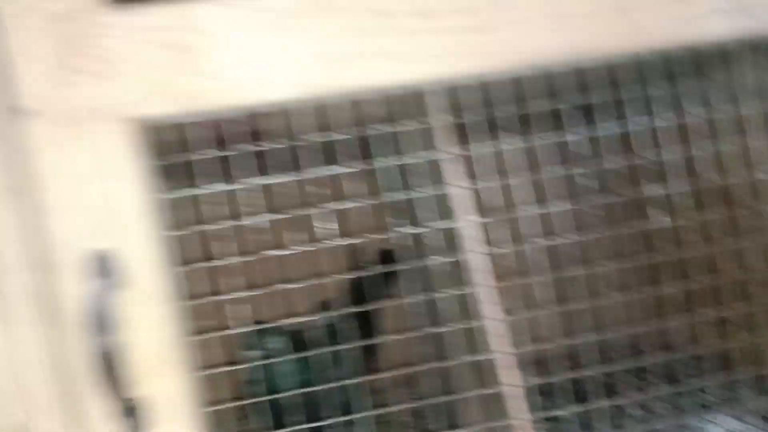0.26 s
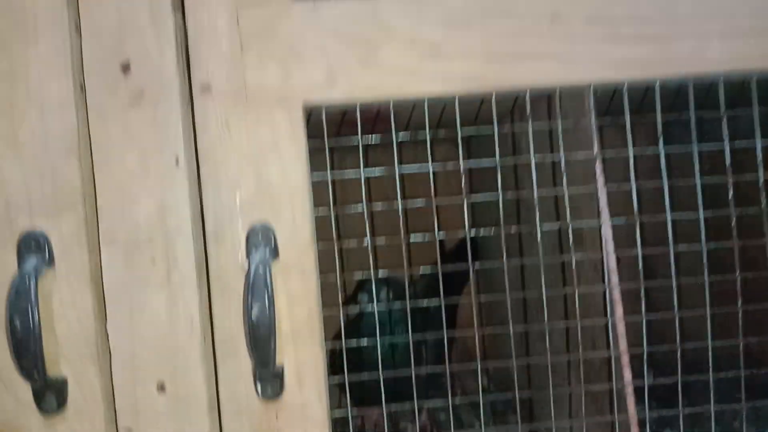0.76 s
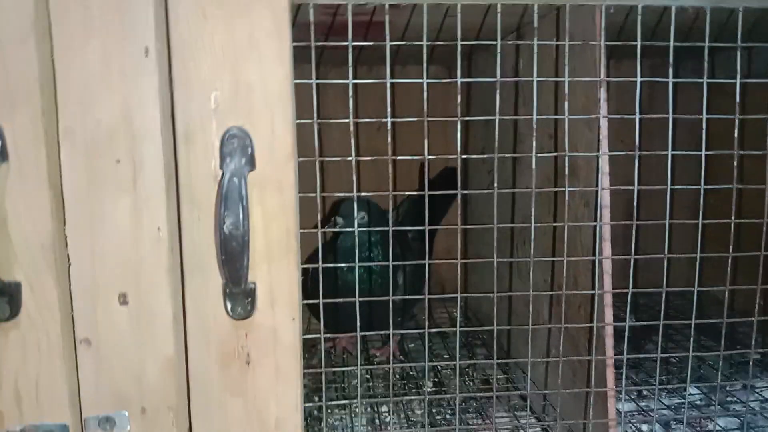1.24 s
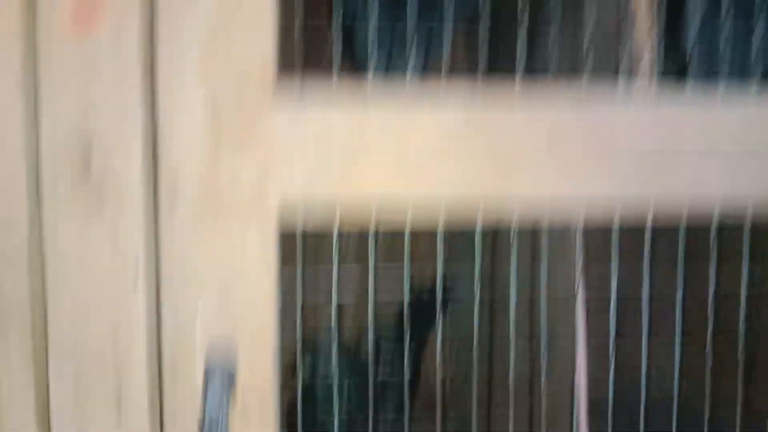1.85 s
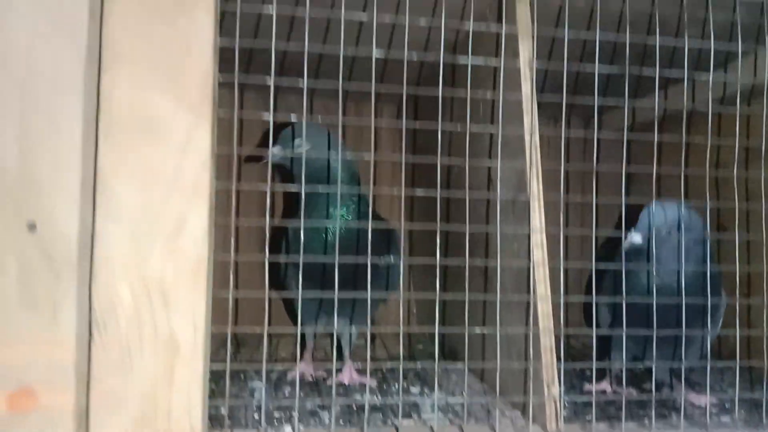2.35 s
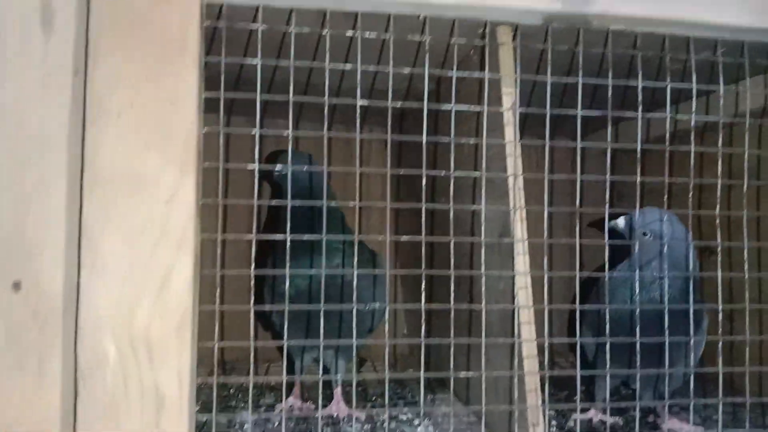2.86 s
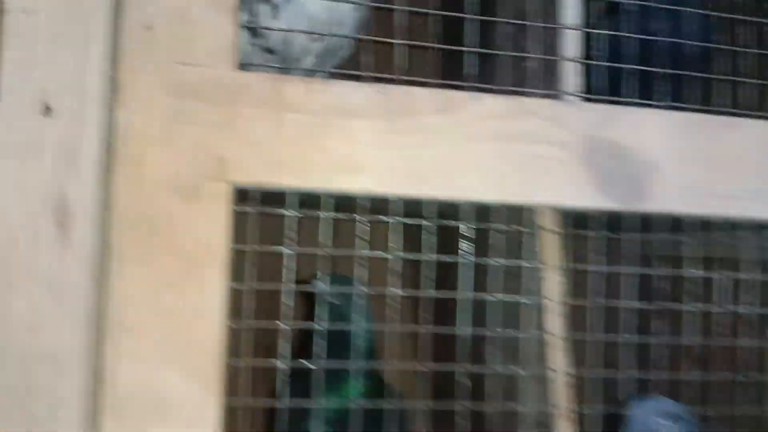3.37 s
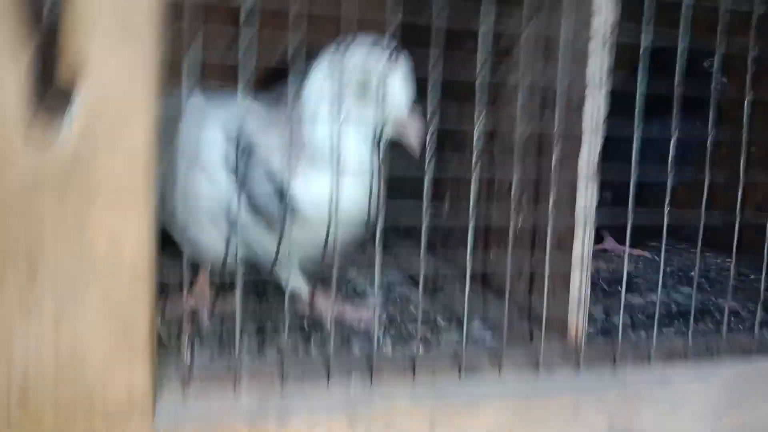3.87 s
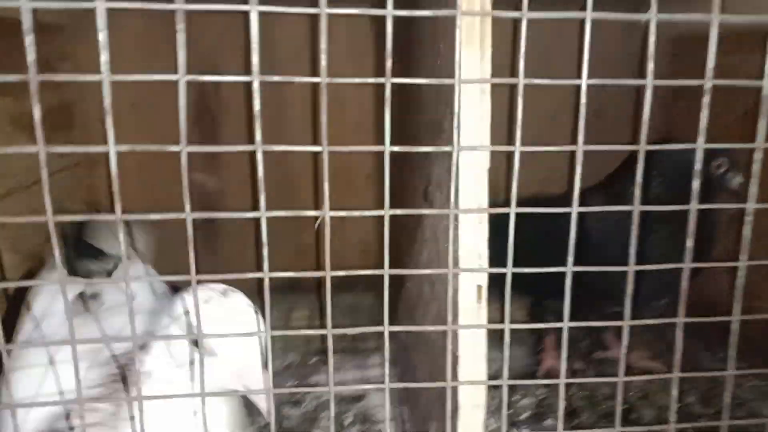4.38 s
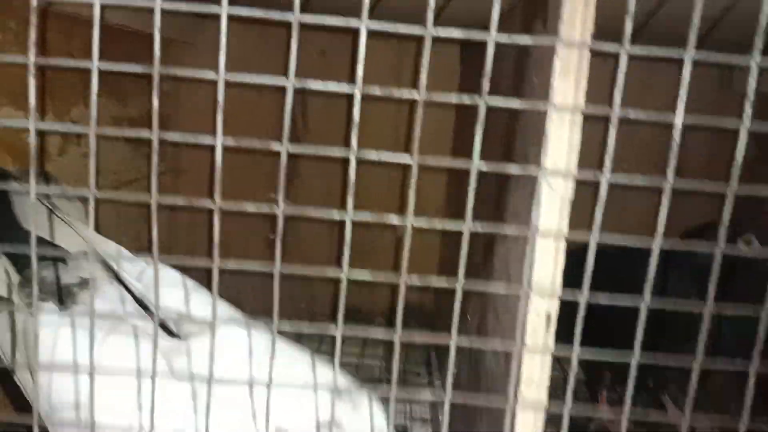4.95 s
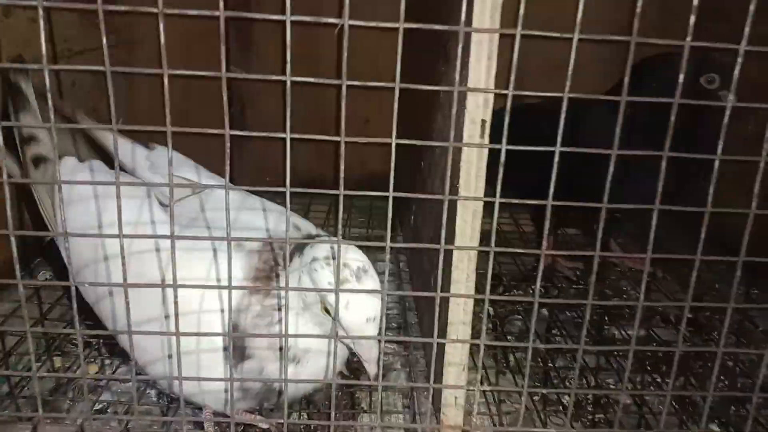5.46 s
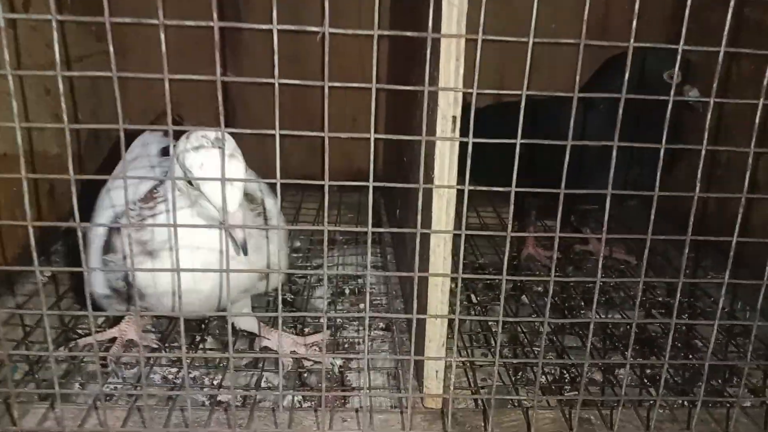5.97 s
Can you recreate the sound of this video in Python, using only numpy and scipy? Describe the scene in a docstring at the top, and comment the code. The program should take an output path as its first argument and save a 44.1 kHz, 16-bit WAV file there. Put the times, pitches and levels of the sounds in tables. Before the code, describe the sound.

In a small wooden pigeon loft, close to a handheld microphone, a bird bumps the planks and flaps rapidly, wings clapping and rattling against its cage. Many pigeons coo over each other in low throbbing warbles. The flapping stops after about a second and a half, the cooing dips briefly, then returns with scratchy scuffs, claw steps and small wire ticks until the end.

```python
"""Wooden pigeon loft with wire cages, heard on a small handheld microphone.
Many birds coo over each other: short gliding, throbbing sines, near ones listed, far ones at random.
One bird flaps at first: fluttering noise, noise-burst claps, struck plank modes.
Then feet and feathers scuffle in the litter: gritty noise, given a thin ringing tone by narrow resonators.
Two wavering low tones and faint air lie underneath; feedback delays give the echo."""
import sys
import numpy as np
from scipy import signal
from scipy.fft import rfft, irfft, next_fast_len
from scipy.io import wavfile

SR = 44100
rng = np.random.default_rng(int(sys.argv[2]) if len(sys.argv) > 2 else 0)


def to_wav(s):
    """Save 16-bit WAV."""
    ch = np.atleast_2d(s).T  # columns
    pcm = np.round(np.clip(ch, -1, 1) * 32767)  # PCM
    wavfile.write(sys.argv[1], SR, pcm.astype(np.int16))


N = 274302

# wavering of the low hum: time_s, level_db
HUM_LEVELS = [(0.0, -68), (0.2, -44.5), (0.52, -55), (0.81, -36), (0.92, -57.5), (1.42, -40.5), (1.55, -59),
              (1.85, -46), (2.2, -56.5), (4.4, -45), (4.55, -54.5), (5.6, -46), (6.22, -53.5)]
# spectrum shape of the loft air: freq_hz, density_db_per_hz
AIR_SPECTRUM = [(15, -41), (25, -7.5), (64, 0.5), (145, 3), (531, -9.5), (775, -5), (4140, -20.5),
                (5430, -40), (16000, -28.5)]
# dry ticks, a claw or quill flicking a wire: start_s, peak_db, centre_hz
WIRE_TICKS = [(0.2339, -25, 2400), (0.2825, -8, 2620), (0.3342, -18, 2280), (0.3715, -12.5, 2260),
              (0.768, -10, 3230), (0.768, -7.5, 12500), (0.816, -8, 2530), (1.1, -12, 5860),
              (1.1348, -21, 2730), (1.1592, -12, 5430), (1.294, -12, 4940), (1.3306, -18, 5620),
              (1.8706, -42, 5060), (1.9028, -24, 5200), (1.903, -34, 11500), (1.959, -36, 12500),
              (3.05, -18, 2710), (3.703, -30, 12000), (4.6124, -19, 3450), (5.7063, -23.5, 2920),
              (5.706, -27.5, 11600)]
# narrow noise swells, rasps and the low body of one clap: start_s, length_s, centre_hz, level_db
NARROW_SWELLS = [(5.162, 0.18, 2930, -52.5), (5.57, 0.21, 2774, -37), (5.593, 0.11, 3990, -42.5),
                 (5.595, 0.26, 2190, -45.5), (1.277, 0.1, 890, -29), (1.49, 0.087, 1590, -54),
                 (1.777, 0.041, 1090, -48)]
# thin squeaks: start_s, length_s, first_pitch_hz, last_pitch_hz, level_db
THIN_SQUEAKS = [(2.04, 0.03, 3750, 3640, -56), (2.08, 0.13, 3345, 3380, -47.5)]
# spectrum shape of the litter: freq_hz, density_db_per_hz
LITTER_SPECTRUM = [(590, -23.5), (1000, -25.5), (1290, -9.5), (1850, -10.5), (2780, -1.5), (4120, -8),
                   (5630, 0), (8360, -25), (12000, -20.5), (16000, -30)]
# feathers and feet scuffing the litter: full_strength_s, held_s, fade_db_per_s, level_db,
# body_db (under 3.5 kHz, relative), sheen_db (over 6.5 kHz, full from 8.2 kHz, relative)
LITTER_SCUFFS = [(1.899, 0.0093, 195, -39.5, 4.5, 3), (1.989, 0.0042, 234, -65, 29.5, 27.5),
                 (2.229, 0.038, 450, -36.5, 1, 3.5), (2.74, 0.05, 500, -29.5, -6.5, 0.5),
                 (3.008, 0.034, 195, -37.5, 4, -3), (3.16, 0.11, 200, -56, -20, 13),
                 (3.331, 0.039, 108, -29.5, 7.5, -2.5), (3.682, 0.041, 52, -38, 5.5, 2.5),
                 (3.786, 0.018, 129, -27, 1, -1), (3.89, 0.24, 89, -37.5, 3.5, 5),
                 (4.112, 0.014, 158, -38, 18, -5), (4.18, 0.055, 302, -39, -17, -16),
                 (4.66, 0.061, 398, -41.5, -10, 10.5), (4.894, 0.061, 79.5, -31.5, -18, 1.5),
                 (4.967, 0.08, 125, -28, 4.5, 3), (5.055, 0.009, 300, -49, -4, -1),
                 (5.137, 0.0067, 129, -40, 16.5, -3), (5.58, 0.046, 94, -37, 3.5, 0),
                 (5.739, 0.053, 156, -35, -7.5, -5), (6.21, 0.02, 99, -45.5, -3, -6)]
# claws landing on the mesh floor: start_s, level_db, tilt_db_per_octave,
# depth_db (under 2.4 kHz, full from 1.9 kHz, relative), t60_s (up to 4 kHz)
FOOTSTEPS = [(1.482, -29, -2.5, -7, 0.1), (1.7826, -36, -1, -1, 0.14), (1.868, -38, 5.5, -19, 0.11),
             (2.324, -58, 9.5, -5, 0.081), (2.451, -24, -10.5, -17, 0.15), (2.627, -35.5, -3, -8, 0.097),
             (2.6815, -40, 3, 6, 0.071), (2.951, -39.5, 0.5, -3, 0.13), (2.992, -29, -8, -16, 0.086),
             (3.052, -24, -15.5, -8, 0.08), (4.104, -25, -3.5, -1, 0.11), (4.172, -22, -10.5, 3, 0.093),
             (4.39, -26.5, 0, -22, 0.092), (4.597, -33.5, -2, -15, 0.07), (4.612, -27.5, 1.5, -8, 0.091),
             (4.7383, -40.5, 7.5, 1, 0.13), (5.515, -23, 0, 1.5, 0.11), (5.706, -33, 8, -12, 0.055),
             (5.8118, -18, -4, 1, 0.11)]
# bumps on the planks: start_s, level_db
PLANK_KNOCKS = [(0.0, -14.5), (0.078, -18)]
# plank modes: freq_hz, level_db, t60_s
PLANK_MODES = [(122, -14, 0.36), (216, -4.5, 0.19), (566, -3, 0.076), (980, 0.5, 0.082), (1395, 4, 0.015)]
# spectrum shape of flapping and claps: freq_hz, density_db_per_hz
WING_SPECTRUM = [(410, -58), (700, -6), (971, -4.5), (1090, -3), (2590, -1), (4100, -7.5), (4750, -3.5),
                 (5400, 0), (6070, -3), (8310, -21), (12000, -13), (16000, -14)]
# air and feathers churned by the flapping bird: time_s, level_db
FLAP_LEVELS = [(0.0, -28), (0.162, -36), (0.668, -30), (1.006, -32.5), (1.21, -31), (1.262, -20.5),
               (1.268, -47), (1.277, -49), (1.285, -26), (1.366, -31), (1.5, -90)]
# wing claps on the cage: start_s, level_db, tilt_db_per_octave, t60_s (up to 4 kHz)
WING_CLAPS = [(0.0438, -6.5, -5.5, 0.069), (0.0812, -14.5, -14.5, 0.14), (0.1408, -18, 0, 0.11),
              (0.1793, -18.5, -4.5, 0.17), (0.2331, -6.5, 1.5, 0.082), (0.28, -11.5, -7, 0.13),
              (0.3202, -9, -4, 0.14), (0.3716, -14.5, -10, 0.15), (0.426, -4, 0, 0.068),
              (0.4786, -12, -9, 0.087), (0.5235, -10.5, -3, 0.097), (0.612, -20.5, -4, 0.56),
              (0.6625, -20, -4.5, 0.34), (0.7532, -15, 1.5, 0.48), (0.816, -12.5, -4, 0.057),
              (0.848, -12, -1, 0.18), (0.9746, -23, -10, 0.17), (1.0864, -9.5, 1.5, 0.46),
              (1.1592, -9, -0.5, 0.098), (1.2231, -26, -5, 0.15), (1.2507, -12.5, -6, 0.047),
              (1.2785, -14, 5, 0.36)]
# murmur of the farther birds: time_s, level_db
MURMUR_LEVELS = [(0.0, -30.5), (0.85, -30), (0.95, -38.5), (1.0, -27.5), (1.6, -46), (1.8, -64.5),
                 (2.18, -80), (2.36, -28), (2.72, -30), (3.07, -51.5), (3.14, -35.5), (3.8, -28.5),
                 (4.38, -32), (4.52, -50), (5.02, -33), (5.25, -42.5), (5.36, -33), (5.75, -29),
                 (5.98, -36), (6.22, -22)]
# loudest nearer syllables: start_s, length_s, first_pitch_hz, last_pitch_hz, level_db (before throb)
NEAR_COOS = [(0.058, 0.061, 242, 190, -17.5), (0.158, 0.066, 624, 500, -25.5), (0.176, 0.07, 212, 208, -24),
             (0.231, 0.038, 472, 467, -21.5), (0.282, 0.09, 449, 572, -25),
             (0.516, 0.045, 497, 509.0, -19.5), (0.562, 0.082, 527, 533, -26),
             (0.615, 0.063, 316, 354, -27.5), (0.641, 0.07, 421, 552, -23.5),
             (0.704, 0.045, 497, 491.0, -18), (0.706, 0.047, 444, 448.0, -17),
             (0.755, 0.071, 466, 418, -23.3), (0.968, 0.05, 475, 474, -17.5), (1.044, 0.066, 355, 313, -22),
             (1.073, 0.076, 423.5, 474, -26), (1.352, 0.12, 588, 465, -35.5), (1.584, 0.11, 303, 300, -33),
             (1.623, 0.042, 548, 561, -29.5), (2.286, 0.23, 369, 419, -40), (2.339, 0.063, 291, 366, -32.5),
             (2.349, 0.11, 570, 444, -34), (2.408, 0.051, 396.0, 390, -29), (2.507, 0.068, 469, 478, -26.5),
             (2.548, 0.065, 232, 274, -22), (2.59, 0.072, 379, 331, -21), (2.661, 0.12, 529, 572, -24),
             (2.696, 0.1, 221, 292, -26.5), (2.712, 0.12, 508, 456, -32), (2.795, 0.064, 779, 790, -44),
             (2.896, 0.087, 725, 770, -40.5), (3.106, 0.09, 694, 700, -36.0), (3.161, 0.045, 529, 526, -29),
             (3.164, 0.056, 255, 245, -28.5), (3.216, 0.033, 730, 733.0, -33.5),
             (3.225, 0.041, 351, 348, -24), (3.3, 0.17, 324.3, 414, -26), (3.379, 0.089, 528, 408, -22.5),
             (3.382, 0.12, 361, 286, -26.5), (3.404, 0.16, 473, 531, -28.5),
             (3.46, 0.074, 237, 225.0, -28.5), (3.487, 0.15, 402, 456, -27),
             (3.583, 0.22, 258.3, 227.7, -25.5), (3.63, 0.12, 308, 304, -19.5),
             (3.7, 0.094, 810, 817, -32.5), (3.754, 0.044, 467, 468, -19), (3.8, 0.077, 215, 210, -30.5),
             (3.898, 0.14, 259, 292, -32.5), (4.024, 0.037, 384, 399, -20.5),
             (4.034, 0.059, 810.0, 810.0, -34), (4.08, 0.045, 355, 348, -23.5),
             (4.154, 0.059, 247, 245, -26.5), (4.265, 0.098, 258, 332, -19), (4.325, 0.037, 337, 340, -20),
             (4.37, 0.092, 482, 514, -30), (4.54, 0.17, 246, 247.5, -33), (4.558, 0.071, 507, 495, -30.5),
             (4.712, 0.13, 415, 416, -35), (4.85, 0.13, 611, 640, -34.5), (4.884, 0.063, 393, 310, -24),
             (4.92, 0.061, 836, 858.0, -39), (4.935, 0.12, 406, 525, -23.5), (5.01, 0.044, 450, 447, -20),
             (5.04, 0.073, 379.4, 341, -23), (5.109, 0.17, 381.3, 306.5, -31.5),
             (5.27, 0.14, 338.7, 363, -23.5), (5.374, 0.2, 446, 507, -27), (5.43, 0.097, 234, 258, -30),
             (5.545, 0.065, 509, 386, -22), (5.59, 0.067, 423, 360, -20.5), (5.644, 0.1, 283.5, 254, -21.5),
             (5.664, 0.077, 364, 325.5, -13), (5.705, 0.11, 510, 498.5, -24.5),
             (5.77, 0.07, 289, 272, -24.0), (5.815, 0.093, 814, 800, -32.5), (5.854, 0.14, 407.4, 457, -27),
             (5.912, 0.2, 386, 434, -30.5), (6.047, 0.11, 361, 361, -26),
             (6.062, 0.17, 379.3, 422.5, -24.5), (6.18, 0.049, 443, 437, -30)]

HUM_HZ, HUM_UPPER_HZ, HUM_UPPER_RELATIVE_DB, AIR_DB = 66.7, 101.6, -8, -57.5
LOFT_T60_S, LOFT_DB, LOFT_DULL_HZ = 0.38, -17, 2770
RING_DB, RING_HZ, RING_WIDTH_HZ, RING_SWING_DB = -4, (1494, 11000), 14.4, 9
TICK_T60_S, TICK_WIDTH_OCTAVES, NARROW_WIDTH_HZ = 0.019, 0.93, 144
SCUFF_RISE_DB_PER_S, SCUFF_RISE_S = 200, 0.05   # a swell starts this long before full strength
STIR_DB, STIR_FROM_S = -60.5, 1.45   # faint stirring between scuffs
TOGETHER_DB = 1.5   # flicker shared by all scuff bands
TREBLE_HASTE_PER_OCTAVE = 0.19   # above 4 kHz a burst dies this share faster
MURMUR_PER_S, MURMUR_HZ = 120, (184.1, 652.3)
MURMUR_TILT_DB = -0.5   # from the lowest to the highest voice
ROLL_DB, ROLL_HZ = 3, 33   # uneven rolling pulse of the whole murmur
FAR_GLIDE_SHARE = 0.11   # widest chance glide within a far syllable, share of its pitch
THROB_HZ, FAR_THROB_DEPTH, NEAR_THROB_DEPTH = (21.777, 54.978), 0.78, 0.46
FAR_WOBBLE_SHARE, NEAR_WOBBLE_SHARE = 0.017, 0.0093
HOARSE_ABOVE_HZ, HOARSE_SHARE = 700, 0.041   # the highest syllables crack and lose their clear pitch
CREST_AT = 0.41   # a throb peaks this far into a syllable: throat widest open
CUTOFF_HZ = 15400


def from_db(db):
    """Decibels to amplitude."""
    return np.exp(np.asarray(db) * np.log(10) / 20)


def rms_one(x):
    """Scales x to rms 1."""
    return x / np.sqrt(np.mean(x ** 2) + 1e-20)


def level_in_time(rows):
    """Levels joined by straight lines in time."""
    time_s, level_db = np.transpose(rows)
    return np.interp(np.arange(N) / SR, time_s, level_db)


def drift(rate_hz):
    """Slow chance of spread 1: noise through two equal poles, at a fortieth of the sample rate."""
    r = np.exp(-80 * np.pi * rate_hz / SR)
    noise = rng.standard_normal(N // 40 + 2002)
    slow = signal.lfilter([1], [1, -2 * r, r * r], noise)[2000:]
    return np.interp(np.arange(N) / 40, np.arange(len(slow)), rms_one(slow))


def colour(x, spectrum):
    """Gives x a spectrum drawn on a log-frequency axis; rms 1."""
    hz, points = np.arange(N // 2 + 1) * SR / N + 1, np.array(spectrum)
    gain_db = np.interp(np.log(hz), np.log(points[:, 0]), points[:, 1])
    return rms_one(irfft(rfft(x) * from_db(gain_db), N))


def bandpass(x, edges_hz, order=2):
    """Butterworth band."""
    return signal.sosfilt(signal.butter(order, edges_hz, "band", fs=SR, output="sos"), x)


def bands(x, count):
    """Splits x into bands even in pitch: (centre_hz, band)."""
    edges = np.geomspace(600, 17000, count + 1)
    return [(np.sqrt(a * b), bandpass(x, [a, b])) for a, b in zip(edges, edges[1:])]


def grains(ticks_per_s, tick_db):
    """Fine hiss with sharp, decaying ticks of uneven size strewn over it."""
    size_db = tick_db + 4.5 * np.minimum(rng.exponential(1, N), 2.5)
    ticks = (rng.random(N) < ticks_per_s / SR) * from_db(size_db)
    return rng.standard_normal(N) * (1 + signal.lfilter([1], [1, -.985], ticks))


def hum():
    """Two low tones that waver in level and phase, over the faint air of the loft."""
    t = np.arange(N) / SR
    lower = np.sin(2 * np.pi * HUM_HZ * t + 0.51 * drift(4.3))
    upper = np.sin(2 * np.pi * HUM_UPPER_HZ * t + 0.78 * drift(11.0))
    tones = lower + from_db(HUM_UPPER_RELATIVE_DB + 3.1 * drift(9.1)) * upper
    air = from_db(AIR_DB + 5.8 * drift(7.8)) * colour(rng.standard_normal(N), AIR_SPECTRUM)
    return from_db(level_in_time(HUM_LEVELS) + 2.2 * drift(3.2)) * tones + air


def loft(x):
    """Eight feedback delays between the plank walls, duller on every round."""
    size = next_fast_len(N + SR)
    w = 2 * np.pi * np.arange(size // 2 + 1) / size
    dull = 1 / (1 + 1j * w * SR / (2 * np.pi * LOFT_DULL_HZ))
    response = 0
    for k, lag in enumerate(rng.uniform(.009, .03, 8) * SR):
        loop = dull * from_db(-60 * lag / SR / LOFT_T60_S) * np.exp(-1j * w * lag)
        response = response + (-1) ** k * loop / (1 - loop)
    return irfft(rfft(x, size) * response, size)[:N]


def ringing(x):
    """Narrow resonators at chance pitches, each drifting in level, give x a thin ringing tone."""
    out, r = 0, np.exp(-np.pi * RING_WIDTH_HZ / SR)
    for place in (np.arange(36) + rng.random(36)) / 36:
        hz = RING_HZ[0] * (RING_HZ[1] / RING_HZ[0]) ** place
        poles = [1, -2 * r * np.cos(2 * np.pi * hz / SR), r * r]
        ring = signal.lfilter([1 - r, 0, r - 1], poles, x + 1e-18)
        out = out + from_db(RING_DB + RING_SWING_DB * np.tanh(drift(5))) * ring
    return out


def wire_ticks():
    """A claw or quill flicks a wire: a few milliseconds of noise around each centre."""
    out, t = np.zeros(N), np.arange(SR // 20) / SR
    for start_s, peak_db, hz in WIRE_TICKS:
        edges = hz * 2 ** (TICK_WIDTH_OCTAVES * np.array([-.5, .5]))
        noise = rng.standard_normal(len(t)) * from_db(-60 * t / TICK_T60_S)
        tick = bandpass(noise, edges, order=3)
        i = round(start_s * SR)
        out[i:i + len(t)] += from_db(peak_db) * tick / np.abs(tick).max()
    return out


def narrow_swells():
    """Rasps, and the low body of one clap: noise in one narrow band, swelling and fading."""
    out = np.zeros(N)
    for start_s, length_s, hz, level_db in NARROW_SWELLS:
        i, n = round(start_s * SR), round(length_s * SR)
        edges = [hz - NARROW_WIDTH_HZ / 2, hz + NARROW_WIDTH_HZ / 2]
        noise = rms_one(bandpass(rng.standard_normal(SR), edges)[-n:])
        out[i:i + n] += from_db(level_db) * np.hanning(n) ** .5 * noise
    return out


def squeaks():
    """Thin squeaks: high gliding sines, barely throbbing."""
    return syllables(THIN_SQUEAKS, depth=0.11, hoarse_share=0.0022)


def scuffle():
    """Grains in the litter: scuffs swell, hold, fade; bands flicker together, the lower ones in patches."""
    t = np.arange(N) / SR
    level = body = sheen = (t >= STIR_FROM_S) * from_db(STIR_DB)
    for full_s, held_s, fade, level_db, body_db, sheen_db in LITTER_SCUFFS:
        rise_db = SCUFF_RISE_DB_PER_S * np.maximum(full_s - t, 0)
        fade_db = fade * np.maximum(t - full_s - held_s, 0)
        gate = np.clip(3 + 3 * (t - full_s) / SCUFF_RISE_S, 0, 1) ** 2
        swell = from_db(level_db - rise_db - fade_db) * gate
        level = level + swell
        body = body + swell * from_db(body_db)
        sheen = sheen + swell * from_db(sheen_db)
    body_db = 20 * np.log10((body + 1e-9) / (level + 1e-9))
    sheen_db = 20 * np.log10((sheen + 1e-9) / (level + 1e-9))
    together, sheen_flicker, out = drift(8.9), drift(26), 0
    grit = grains(ticks_per_s=120, tick_db=-8)
    for hz, band in bands(colour(grit, LITTER_SPECTRUM), count=26):
        low, high = np.clip(np.log2(3500 / hz), 0, 1), np.clip(np.log2(hz / 6500) * 3, 0, 1)
        flicker_db = TOGETHER_DB * together + 2.85 * (1 - high) * drift(13.4) + 3 * high * sheen_flicker
        out = out + band * from_db(low * body_db + high * sheen_db + flicker_db)
    return level * out


def bursts(events, grit, spectrum, rise_s, crack_db, bend, tint_db):
    """Noise bursts that rise fast and die away, tilted dull or bright, each with a chance colour.
    A bend over 1 holds the puff up at first, then ends it quickly."""
    out, t = 0, np.arange(SR // 3) / SR
    tint = rng.normal(0, tint_db, (len(events), 14))
    crack, onset = from_db(crack_db - 60 * t / 0.013), 1 - np.exp(-t / rise_s)
    for k, (hz, band) in enumerate(bands(colour(grit, spectrum), count=14)):
        envelope = np.zeros(N + len(t))
        octaves = np.clip(np.log2(hz / 2000), -.8, 1.5)
        low = np.clip(np.log2(2400 / hz) * 3, 0, 1)
        haste = 1 + TREBLE_HASTE_PER_OCTAVE * max(np.log2(hz / 4000), 0)
        for (start_s, level_db, tilt_db, depth_db, t60_s), own_db in zip(events, tint):
            i = round(start_s * SR)
            shape = onset * (crack + from_db(-60 * (haste * t / t60_s) ** bend))
            gain_db = level_db + octaves * tilt_db + low * depth_db + own_db[k]
            envelope[i:i + len(t)] += from_db(gain_db) * shape
        out = out + band * envelope[:N]
    return out


def steps():
    """Claws landing on the mesh floor: soft puffs of litter-coloured noise."""
    return bursts(FOOTSTEPS, rng.standard_normal(N), LITTER_SPECTRUM,
                  rise_s=0.0018, crack_db=-3.0, bend=1.9, tint_db=2.0)


def knocks():
    """The bird bumps the planks: impulses ring two-pole modes."""
    clicks, out = np.zeros(N), 0
    for start_s, level_db in PLANK_KNOCKS:
        clicks[round(start_s * SR)] = from_db(level_db)
    for hz, level_db, t60_s in PLANK_MODES:
        r, w = from_db(-60 / (t60_s * SR)), 2 * np.pi * hz / SR
        poles = [1, -2 * r * np.cos(w), r * r]
        out = out + signal.lfilter([0, from_db(level_db) * np.sin(w)], poles, clicks + 1e-18)
    # high-pass at 90 Hz keeps the knocks free of deep bass
    return signal.sosfilt(signal.butter(2, 90, "high", fs=SR, output="sos"), out)


def flapping():
    """Churned air and feathers: a crackling rush that flutters in all bands at once."""
    rush = colour(grains(ticks_per_s=500, tick_db=-8.5), WING_SPECTRUM)
    going = np.arange(N) < FLAP_LEVELS[-1][0] * SR
    return going * from_db(level_in_time(FLAP_LEVELS) + 2.8 * drift(61.2)) * rush


def claps():
    """Wings hitting the cage: sharp bursts of rattling grains."""
    events = np.insert(WING_CLAPS, 3, 0, axis=1)   # depth_db 0
    return bursts(events, grains(ticks_per_s=200, tick_db=-11.0), WING_SPECTRUM,
                  rise_s=0.001, crack_db=-3.5, bend=0.98, tint_db=1)


def syllables(rows, depth, wobble_share=FAR_WOBBLE_SHARE, hoarse_share=HOARSE_SHARE):
    """Gliding, wobbling sines; the throat opens and shuts, so each throbs at a pace of its own."""
    out, wobble, crackle = np.zeros(N + SR), drift(39.3), drift(93)
    for start_s, length_s, first_hz, last_hz, level_db in rows:
        pace, place = rng.random(2)
        i, n = max(round(start_s * SR), 0), round(length_s * SR)
        j = int(place * (N - n))
        if first_hz > HOARSE_ABOVE_HZ:
            waver = hoarse_share * crackle[j:j + n]
        else:
            waver = wobble_share * wobble[j:j + n]
        pitch = np.linspace(first_hz, last_hz, n) * (1 + waver)
        throb_hz = THROB_HZ[0] + pace * (THROB_HZ[1] - THROB_HZ[0])
        throb = np.cos(2 * np.pi * throb_hz * (np.arange(n) - CREST_AT * n) / SR)
        swell = np.hanning(n) ** 0.5 * (1 + depth * throb)
        phase = 2 * np.pi * np.cumsum(pitch) / SR
        out[i:i + n] += from_db(level_db) * swell * np.sin(phase)
    return out[:N]


def murmur():
    """Far birds: random syllables, mostly mid-range, gliding by chance, swelling with the flock's mood."""
    start, length, one, other, soft = rng.random((round(MURMUR_PER_S * N / SR), 5)).T
    place = (one + other) / 2
    hz = MURMUR_HZ[0] + place * (MURMUR_HZ[1] - MURMUR_HZ[0])
    slide = FAR_GLIDE_SHARE * (rng.random(len(hz)) - .5)
    level_db = MURMUR_TILT_DB * place - 5 * soft
    rows = np.transpose([start * N / SR, 0.0446 + 0.0874 * length,
                         hz * (1 - slide), hz * (1 + slide), level_db])
    mood_db = level_in_time(MURMUR_LEVELS) + ROLL_DB * drift(ROLL_HZ)
    return from_db(mood_db) * rms_one(syllables(rows, FAR_THROB_DEPTH))


def coos():
    """Near birds: the listed syllables, throbbing less deeply than the far ones."""
    return syllables(NEAR_COOS, NEAR_THROB_DEPTH, wobble_share=NEAR_WOBBLE_SHARE)


def scene():
    """Birds and their echoes over the hum."""
    feet = scuffle() + steps() + wire_ticks()
    feet = feet + ringing(feet) + narrow_swells() + squeaks()
    wings = knocks() + flapping() + claps()
    voices = murmur() + coos()
    birds = feet + wings + voices
    return (hum() + from_db(LOFT_DB) * loft(birds) + birds)[None]


def record(dry):
    """Microphone: the loudest peaks are rounded, the top is cut steeply."""
    steep = signal.ellip(10, .5, 60, CUTOFF_HZ, fs=SR, output="sos")
    return signal.sosfilt(steep, np.tanh(dry))


dry = scene()
out = record(dry)
to_wav(out)
```